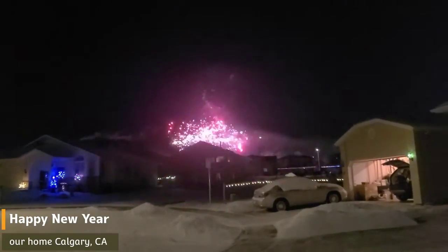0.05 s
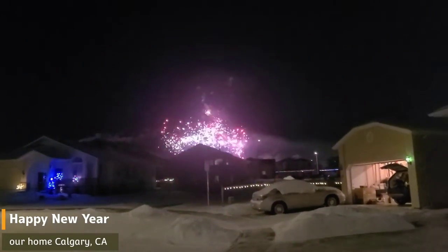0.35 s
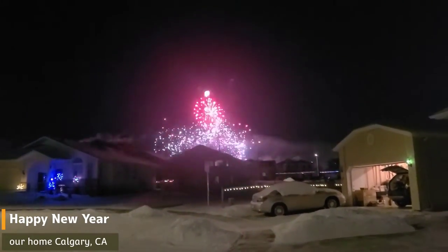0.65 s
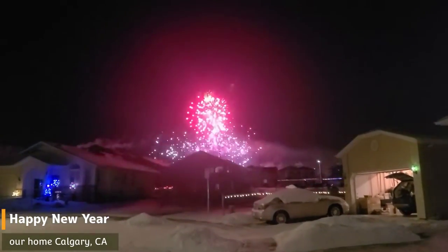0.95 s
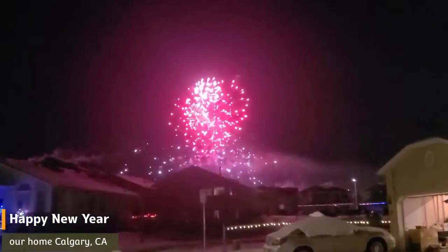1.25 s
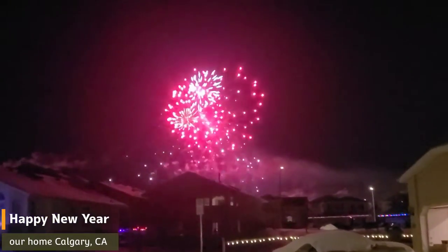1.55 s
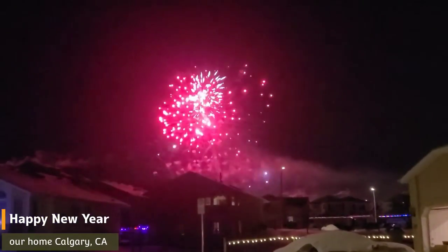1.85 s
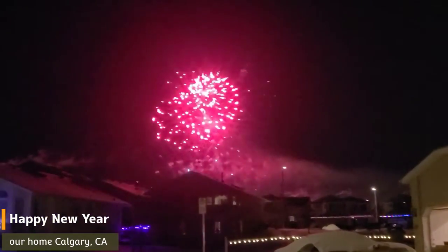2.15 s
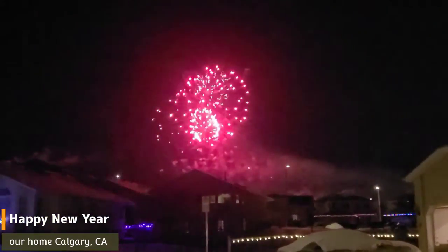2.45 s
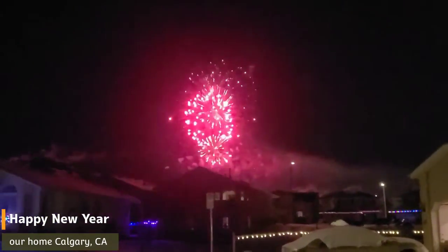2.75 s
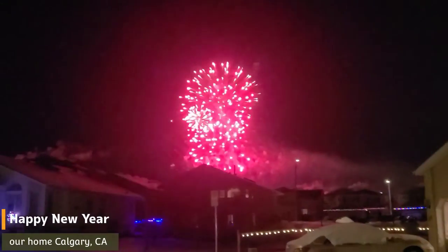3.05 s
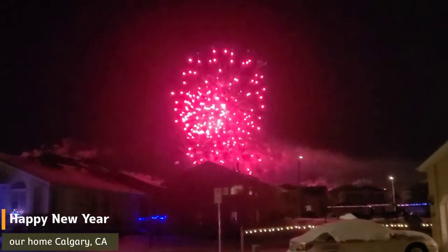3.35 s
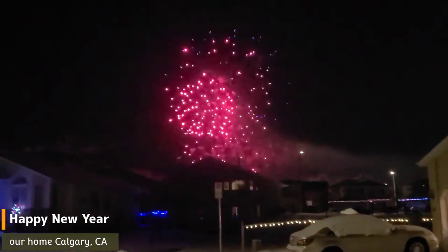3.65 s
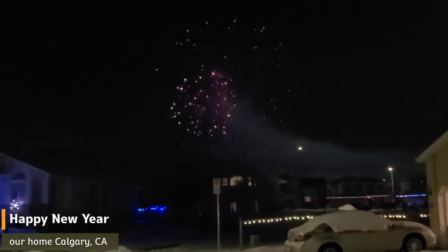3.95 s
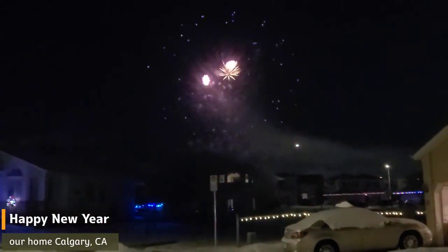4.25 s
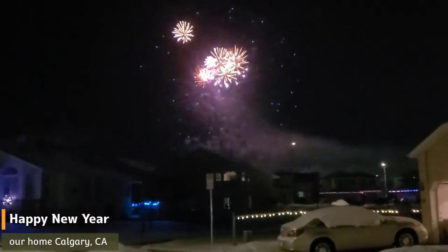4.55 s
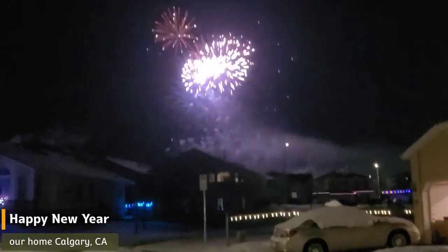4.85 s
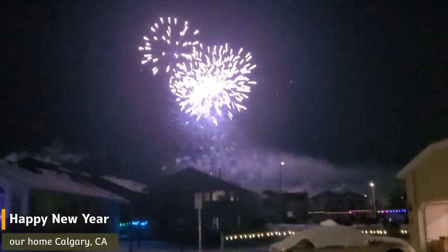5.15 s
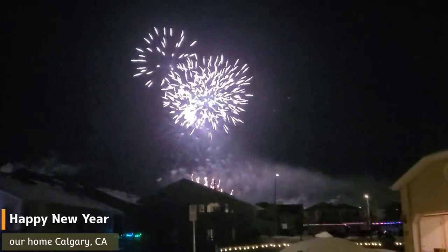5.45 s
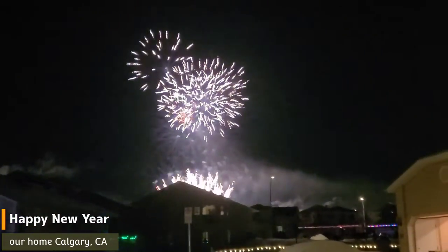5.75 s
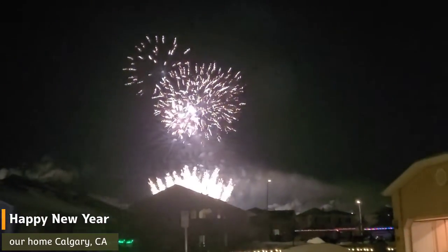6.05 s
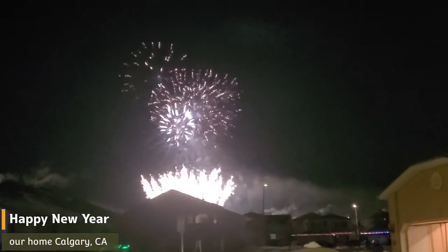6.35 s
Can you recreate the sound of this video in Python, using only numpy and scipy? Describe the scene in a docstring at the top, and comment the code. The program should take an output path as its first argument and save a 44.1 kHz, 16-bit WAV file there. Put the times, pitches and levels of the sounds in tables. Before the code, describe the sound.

Fireworks bang in sharp, rapid volleys over a street at night, with hollow booms, echoes off houses and distant pops.

```python
"""First come soft thumps and faint crackles over a distant rumble; then volleys of fireworks bang above a snowy
street at night. Each bursting shell sends out a shock wave, a sudden jump in air pressure, and the loudest
peaks are rounded off. Nearby ground and walls answer with a hollow boom, house fronts slap the bang back, and
farther roofs keep it rolling. Between the volleys, more thumps and far pops sound over the faint fizz of the
fireworks' burning stars."""
import sys
import numpy as np
from scipy import signal
from scipy.fft import rfft, irfft, next_fast_len
from scipy.io import wavfile
from scipy.ndimage import map_coordinates

SR = 44100
rng = np.random.default_rng(int(sys.argv[2]) if len(sys.argv) > 2 else 0)


def master_out(mix):
    """Clip the mix to full scale and print it as 16-bit PCM to the path in sys.argv[1]."""
    frames = np.transpose(np.atleast_2d(mix))
    ceiling = np.clip(frames, -1, 1)
    pcm = np.round(ceiling * 32767).astype(np.int16)
    wavfile.write(sys.argv[1], SR, pcm)


N = 282681

# bursting shells: t/s, level/dB, brightness/dB, time between the two shocks/s, midrange boost/dB
SHELLS = [(0.6474, -5, -17.5, 0.0021, 0.5), (0.6576, -10.5, -13, 0.0023, -1),
          (0.6823, -7.5, -15, 0.0018, 0.5), (0.7991, -7.5, -14, 0.0021, 0),
          (0.8449, -6.5, -9.5, 0.0019, -0.5), (0.8535, -10, -26, 0.00208, -1),
          (0.8799, -7, -27, 0.0014, -1.5), (0.881, -10, -8.5, 0.0022, -18), (0.8936, -8, -12, 0.0021, 4),
          (0.8973, -12, -18, 0.0016, -6), (1.0593, -5, -21, 0.00209, -3.5), (1.125, -7, -21.5, 0.0024, -5),
          (1.194, -7, -11, 0.0019, -4.5), (1.2646, -6.5, -8.5, 0.0021, -3), (1.3533, -6.5, -25, 0.0021, 1),
          (1.3766, -8.5, -17, 0.0027, -3.5), (1.4203, -7.5, -12.5, 0.0021, -2),
          (1.476, -7.5, -15.5, 0.0021, -1.5), (1.5338, -6.5, -16, 0.0021, -3), (1.61, -9, -8, 0.0021, 1.5),
          (1.771, -6, -13.5, 0.0025, -2.5), (1.9253, -7.5, -14, 0.0023, 0),
          (1.9879, -8.5, -10.5, 0.0018, 3), (2.261, -7.5, -11.5, 0.0026, -2),
          (2.6043, -8, -12.5, 0.0023, 1), (2.8963, -9, -13.5, 0.0023, 3.5), (3.1464, -8, -13.5, 0.0023, 3),
          (3.6737, -8.5, -18.5, 0.00234, 2.1), (4.0437, -5.5, -12, 0.0018, 3.5),
          (4.2485, -7.5, -12.5, 0.0026, 1.5), (4.3291, -8.5, -11, 0.0021, 0),
          (5.506, -6.5, -13, 0.0022, 5.5), (5.6462, -6, -12, 0.0018, 3), (5.713, -7.5, -11.5, 0.0024, 3.5),
          (5.8264, -6, -24, 0.0022, 5), (5.8524, -7.5, -14.5, 0.0025, 0), (5.904, -10, -10, 0.0028, 2),
          (5.9096, -7, -12.5, 0.0026, -2.5), (5.954, -6.5, -18.5, 0.0025, -4),
          (6.035, -9, -16.5, 0.0022, 1), (6.22, -9, -13, 0.0024, 1)]
# tone of the shock wave: f/Hz, level/dB
SHOCK_TONE = [(22, -9), (45, -5), (65, -1.5), (140, -7.5), (260, 1), (480, 6.5), (750, 1.5), (1200, 7),
              (1800, -0.5), (4000, -6.5), (12000, -8.5)]
# tone of the crack on each shock: f/Hz, level/dB
CRACK_TONE = [(500, 9.5), (2000, 2.5), (3600, 3), (7000, -14.5), (12000, -8.5), (16000, -11)]
# hollow notes of the nearby ground and walls: f/Hz, width/Hz, level/dB
BOOM_NOTES = [(74, 27, -1), (177, 26, -11)]
# strength of that boom: t/s, level/dB
BOOM_STRENGTH = [(0, 2.5), (2, 1.5), (3.1, 6), (4.1, 5), (5.6, 2), (5.95, 5.5), (6.4, 9)]
# echoes from house fronts: delay/s, level/dB, dull above f/Hz, left minus right/dB
HOUSE_ECHOES = [(.0101, -16, 14000, 2), (.0545, -13.5, 450, 0), (.0555, -21.5, 12000, 1),
                (.0618, -14.5, 600, 0), (.0878, -17, 1900, -1), (.0902, -22, 1600, -1),
                (.0985, -23, 1500, 1), (.1034, -19.5, 1400, 1), (.139, -24, 600, -1), (.1655, -19, 400, 0)]
# tone of the street's rolling echo: f/Hz, level/dB
STREET_TONE = [(25, -26), (50, -12), (80, 8), (130, -21), (180, -6), (280, 3.5), (420, -10), (540, -5),
               (750, -9.5), (1200, -13), (2000, -17), (3000, -20), (6000, -34), (14000, -36.5)]
# time that echo takes to fade by 60 dB (called t60 below): f/Hz, t/s
STREET_FADE = [(80, 1.02), (300, 0.99), (1500, 0.73), (4000, 0.62), (12000, 0.86)]
# low thumps: t/s, level/dB, starting f/Hz
LOW_THUMPS = [(0.005, -26.5, 112), (0.062, -27, 69), (3.559, -17.5, 106), (3.594, -12.5, 68),
              (3.646, -15, 70), (4.666, -28, 130), (4.856, -19, 100)]
# the clearest far pops: t/s, level/dB, dull above f/Hz
FAR_POPS = [(0.121, -30, 1500), (0.165, -33, 3000), (0.477, -42, 5000), (0.498, -34, 1800),
            (0.512, -28.5, 4900), (0.545, -22.5, 1300), (0.55, -27.5, 1800), (0.613, -37, 2400),
            (0.77, -11, 2880), (0.967, -12, 2650), (1.249, -12.5, 5130), (2.348, -15.5, 1400),
            (2.45, -25, 1390), (2.488, -25, 1390), (2.862, -29, 1500), (3.339, -23, 1700),
            (3.344, -28, 1484), (3.372, -28, 1200), (3.506, -29, 1300), (3.627, -26, 1500),
            (3.838, -22.5, 2090), (4.21, -23, 1610), (4.417, -22.5, 1770), (4.646, -29, 1400),
            (4.661, -21.5, 2000), (4.719, -23, 1300), (4.849, -30, 1700), (4.929, -28, 1600),
            (4.969, -44, 2610), (5.038, -30, 2600), (5.06, -24, 1100), (5.073, -21, 950),
            (5.238, -38, 3600), (5.321, -25, 2500), (5.356, -27.5, 1300), (6.121, -33, 1300)]
# tone of a far pop: f/Hz, level/dB
POP_TONE = [(200, 13), (850, 9), (1800, -2), (7000, -19.5)]
# tone of the distant rumble: f/Hz, level/dB
RUMBLE_TONE = [(25, -8), (60, 9.5), (85, 1.5), (130, 2), (290, 2.5), (410, -1), (520, -12), (800, -14),
               (1200, -17), (1900, -29.5), (3300, -38), (9500, -62)]
# strength of that rumble: t/s, level/dB
RUMBLE_STRENGTH = [(0, -36), (.35, -43), (4.8, -37.5), (5.401, -45), (6.4, -40)]
# tone of the burning stars' fizz: f/Hz, level/dB
FIZZ_TONE = [(200, -11), (550, 3), (1200, 1), (1900, -3.5), (2500, -3.5), (3300, -11.5), (4500, -16.5),
             (6000, -23), (8000, -26), (9500, -31.5), (15000, -33)]
# strength of that fizz: t/s, level/dB
FIZZ_STRENGTH = [(0, -57), (.6, -53.5), (3.5, -51.5), (5.05, -56.5), (5.45, -61.5), (6.4, -63)]
# how alike the two ears hear noise from all around: f/Hz, likeness (1 = the same)
EAR_LIKENESS = [(100, 1), (300, 0.87), (1000, 0.019), (2500, 0.08), (8000, 0.035)]
# the microphone's uneven treble: f/Hz, level/dB
MIC_TONE = [(1600, 0), (2000, 3.5), (2450, -4.5), (3300, 0), (5200, 2), (6500, 8), (9000, 0.5),
            (11400, 3.5), (14000, -0.5), (16000, -8)]
# balance of the microphone's two sides: f/Hz, left minus right/dB
MIC_BALANCE = [(4000, -0.5), (8000, 1.5), (12000, -2)]


def shell_bangs(blast_db=-0.3, crack_db=-1.54, closing_db=-11, front_hz=5500, closing_hz=210, sag_hz=88):
    """Each shell makes the air pressure jump, slide down into suction, then close with a softer shock."""
    out, t = np.zeros((2, N)), np.arange(2048) / SR
    span, crack_t60, crack_rise_s, typical_bright_db = .0036 * SR, .0045, .0002, -18
    same_energy = lambda v: v / np.sqrt(np.mean(np.sum(v ** 2, -1)) / span)
    smooth = lambda v, hz: signal.lfilter(*signal.butter(1, min(hz, SR / 3), fs=SR), v)
    for start, db, bright_db, length_s, mid_db in SHELLS:
        closed = t > length_s
        wave = 1 - 2 * np.minimum(t / length_s, 1) + smooth(closed * 1., closing_hz)
        wave = smooth(wave, front_hz * amp((bright_db - typical_bright_db) / 2))  # brighter is steeper
        wave = wave - smooth(wave, sag_hz)  # losing bass makes the pressure overshoot
        midrange = pulse([(400, 0.0073), (1000, mid_db), (1800, mid_db), (4000, 0)])
        tone = np.convolve(pulse(SHOCK_TONE), midrange)
        wave = same_energy(signal.fftconvolve(wave, tone)[:len(t)])
        # rough air frays both shocks into a noisy crack
        opening = (1 - np.exp(-t / crack_rise_s)) * amp(-60 * t / crack_t60)
        closing = closed * amp(closing_db - 60 * np.abs(t - length_s) / crack_t60)
        grit = rng.standard_normal((2, len(t))) + 0.64 * rng.standard_normal(len(t))  # ears share a part
        grit = filtered(grit, lambda hz: amp(at_hz(CRACK_TONE, hz)))
        crack = amp(db + bright_db + crack_db) * same_energy((opening + closing) * grit)
        add(out, start, amp(db + blast_db) * (wave + splinters(wave)) + crack)
    return out


def splinters(wave, count=7, mean_delay_s=.003, level_db=-18, centre_hz=1100):
    """Nearby edges throw back thin, late copies that make each shock ragged in its own way."""
    delays = rng.exponential(mean_delay_s, count)
    sizes = rng.standard_normal(count)
    ear_gains = sizes * (1 + np.outer([1, -1], rng.uniform(-.4, .4, count)))
    copies = lambda hz: ear_gains @ np.exp(-2j * np.pi * np.outer(delays, hz))
    band = lambda hz: 2j * hz * centre_hz / (centre_hz + 1j * hz) ** 2
    return amp(level_db) * filtered(wave, lambda hz: copies(hz) * band(hz))


def ground_boom(bangs, delay_s=0.00776):
    """The nearest ground and walls answer each bang with a short, hollow boom."""
    ring = lambda hz: sum(amp(db) * 1j * hz * width / (note ** 2 - hz ** 2 + 1j * hz * width)
                          for note, width, db in BOOM_NOTES)
    push = amp(over_time(BOOM_STRENGTH)) * bangs
    return filtered(push, lambda hz: np.exp(-2j * np.pi * hz * delay_s) * ring(hz))


def house_slaps(bangs, level_db=-6, angle_db=2, scatter=.35, scatter_t60=.008):
    """House fronts send back dull copies of each bang, smeared by eaves and porches."""
    out, t = np.zeros((2, N)), np.arange(2048) / SR
    for delay, db, dull_hz, pan_db in HOUSE_ECHOES:
        wall = wide_noise([(200, 5.5), (1000, -9), (12000, -11)], len(t)) * amp(-60 * t / scatter_t60)
        wall = scatter * wall / np.linalg.norm(wall[0])
        wall[:, 0] += 1  # one clean bounce ahead of the smear
        echo = signal.fftconvolve(bangs, wall, axes=1)[:, :N]
        echo = filtered(echo, lambda hz: 1 / (1 + 1j * hz / dull_hz))
        drift_db = angle_db * wobble(2.34, N)  # bangs from different heights hit at different angles
        ears_db = np.array([[pan_db], [-pan_db]]) / 2
        add(out, delay, amp(level_db + db + drift_db + ears_db) * echo)
    return out


def street_roll(roll_db=-19, rise_s=.08, near_db=8, near_t60=.07, volley_db=1, volley_s=.15):
    """Nearby ground and cars scatter each bang at once; farther roofs roll it on in uneven lumps."""
    out, size = np.zeros((2, N)), 3 * SR // 2
    t, shell_times = np.arange(size) / SR, np.transpose(SHELLS)[0]
    shape = 1 - np.exp(-t / rise_s) + amp(near_db - 60 * t / near_t60)
    for start, db, *_ in SHELLS:
        hz, age, bands = signal.stft(wide_noise(STREET_TONE, size), SR, nperseg=512)
        fade = amp(-60 * age / at_hz(STREET_FADE, hz)[:, None])
        tail = signal.istft(bands * fade, SR, nperseg=512)[1][:, :size]
        low = filtered(tail, lambda hz: 1 / (1 + (hz / 2500) ** 4))
        grains = unit(amp(3.3 * wobble(420, size)))  # the treble returns in tiny separate echoes
        lumps = unit(amp(3.9 * wobble(130.25, size)))
        tail = (tail - low) * grains + low * lumps
        # the echoes are turned down when bangs crowd together
        crowding = np.sum(np.exp(-np.abs(shell_times - start) / volley_s))
        add(out, start, amp(db + roll_db - volley_db * np.log2(crowding)) * shape * tail)
    return out


def thumps(push_db=1, push_t60=0.12, rise_s=0.0036, sink_to=0.3, sink_s=0.025, puff_db=-7, puff_t60=0.068):
    """Soft, low pushes of air sink in pitch as they die away, each with a dull puff."""
    out, t = np.zeros((2, N)), np.arange(SR // 4) / SR
    cycles_per_hz = np.cumsum(sink_to + (1 - sink_to) * np.exp(-t / sink_s)) / SR
    puff_tone = [(30, 0), (80, -1), (170, 0), (300, -8), (900, -40), (3000, -90)]
    for start, db, hz in LOW_THUMPS:
        push = amp(push_db - 60 * t / push_t60) * np.sin(2 * np.pi * hz * cycles_per_hz)
        puff = amp(puff_db - 60 * t / puff_t60) * wide_noise(puff_tone, len(t))
        add(out, start, amp(db) * (push + puff) * (1 - np.exp(-t / rise_s)))
    return out


def far_crackles(level_db=-5, thin=0.3, snap_size=3.5, scatter_t60=.03):
    """Each far pop is a snap and a brief scatter of noise, dulled by the air on its way."""
    out, t = np.zeros((2, N)), np.arange(2048) / SR
    snap = snap_size * pulse(POP_TONE) / np.linalg.norm(pulse(POP_TONE))
    for start, db, dull_hz in FAR_POPS:
        pop = snap + amp(-60 * t / scatter_t60) * wide_noise(POP_TONE, len(t))
        pop = filtered(pop, lambda hz: 1j * hz / (thin * dull_hz + 1j * hz))  # brighter pops lose more bass
        pop = signal.lfilter(*signal.butter(2, min(dull_hz, SR / 4), fs=SR), pop)
        add(out, start, amp(db + level_db) * pop)
    return out


def distant_rumble(uneven_db=1.5, ticks_per_s=80, tick_s=.003, ticks_db=-12):
    """The far-off display rumbles on, dotted with soft ticks from pops and stray echoes."""
    swell = amp(over_time(RUMBLE_STRENGTH) + uneven_db * wobble(23, N))
    starts = rng.random(N) < ticks_per_s / SR
    fades = signal.lfilter([1], [1, -np.exp(-1 / (tick_s * SR))], starts)
    ticks = fades * wide_noise([(150, -10), (400, 9.5), (900, -2), (1900, -13.5), (7000, -9)], N)
    ticks = unit(filtered(ticks, lambda hz: 1 / (1 + (hz / 3100) ** 4)))  # distance softens them
    return swell * (wide_noise(RUMBLE_TONE, N) + amp(ticks_db) * ticks)


def star_fizz(uneven_db=.8, grain_db=2.8):
    """Burning stars, the glowing bits of a firework, keep up a faint, grainy fizz that fills the lulls."""
    swell = amp(over_time(FIZZ_STRENGTH) + uneven_db * wobble(22, N))
    grains = amp(grain_db * wobble(130, N))
    return swell * unit(grains * wide_noise(FIZZ_TONE, N))


def wide_noise(tone, size):
    """Noise from all around: alike in both ears in the bass, unrelated in the treble."""
    angle = lambda hz: np.arccos(np.clip(at_hz(EAR_LIKENESS, hz), -1, 1)) / 2
    gains = lambda hz: amp(at_hz(tone, hz)) * [np.cos(angle(hz)), np.sin(angle(hz))]
    shared, opposite = filtered(rng.standard_normal((2, size)), gains)
    return unit(np.array([shared + opposite, shared - opposite]))


def pulse(tone, size=2048):
    """The most sudden click that has this tone (rows of f/Hz, level/dB)."""
    cepstrum = irfft(np.log(amp(at_hz(tone, np.fft.rfftfreq(size, 1 / SR)))))
    cepstrum[1:size // 2] *= 2  # doubling one half and clearing the other packs the energy at the start
    cepstrum[size // 2 + 1:] = 0
    return irfft(np.exp(rfft(cepstrum)))


def amp(db):
    """Turn decibels into a multiplier."""
    return 10 ** (np.asarray(db) / 20)


def unit(x):
    """Scale to an average strength (rms) of 1."""
    return x / np.sqrt(np.mean(x ** 2) + 1e-20)


def at_hz(points, hz):
    """Read between rows of (f/Hz, value), with octaves evenly spaced."""
    freqs, values = np.transpose(points)
    return np.interp(np.log(hz + 1), np.log(freqs + 1), values)


def over_time(points):
    """Join rows of (t/s, value) with straight lines across the whole scene."""
    return np.interp(np.arange(N) / SR, *np.transpose(points))


def wobble(rate, size):
    """A smooth curve through `rate` random points a second."""
    return map_coordinates(rng.standard_normal(int(size * rate / SR) + 4), [np.arange(size) * rate / SR])


def filtered(x, response):
    """Scale and delay each frequency in x as response(hz) says."""
    size = x.shape[-1]
    padded = next_fast_len(size + 8192)
    return irfft(rfft(x, padded) * response(np.fft.rfftfreq(padded, 1 / SR)), padded)[..., :size]


def add(track, start_s, sound):
    """Mix a sound into the track at the given time."""
    i = max(round(start_s * SR), 0)
    track[:, i:i + sound.shape[-1]] += sound[..., :max(N - i, 0)]


def scene():
    """The bangs, their echoes and the quieter sounds behind them."""
    bangs = shell_bangs()
    echoes = ground_boom(bangs) + house_slaps(bangs) + street_roll()
    return bangs + echoes + thumps() + far_crackles() + distant_rumble() + star_fizz()


def record(dry):
    """The microphone colours the sound; the loudest peaks are rounded off and the highest treble is cut."""
    ceiling, top_hz = .97, 16000
    heard = signal.fftconvolve(dry, pulse(MIC_TONE)[None], axes=1)[:, :N]
    heard = filtered(heard, lambda hz: amp(np.outer([.5, -.5], at_hz(MIC_BALANCE, hz))))
    squashed = heard / (1 + np.abs(heard / ceiling) ** 6) ** (1 / 6)
    return filtered(squashed, lambda hz: 1 / (1 + (hz / top_hz) ** 80))


dry = scene()
out = record(dry)
master_out(out)
```